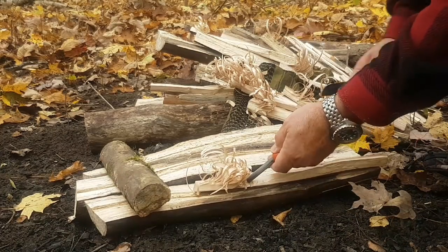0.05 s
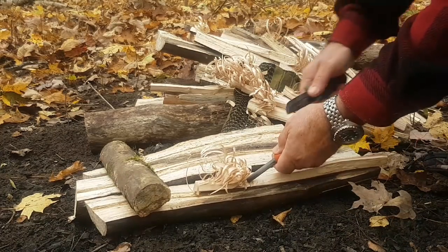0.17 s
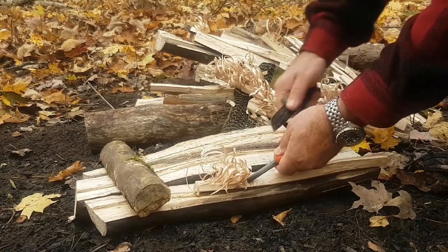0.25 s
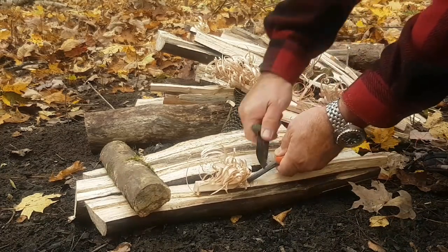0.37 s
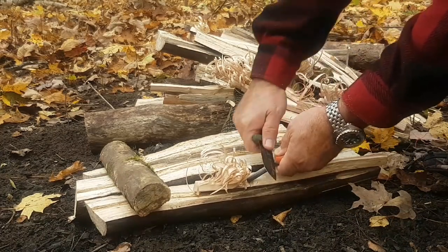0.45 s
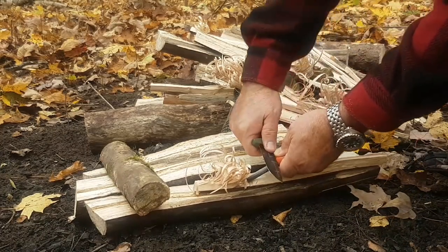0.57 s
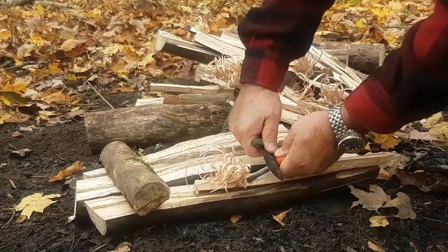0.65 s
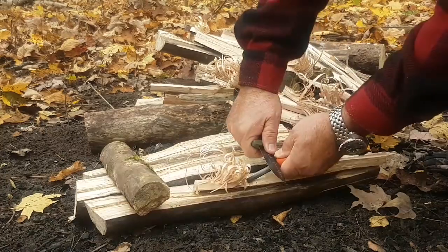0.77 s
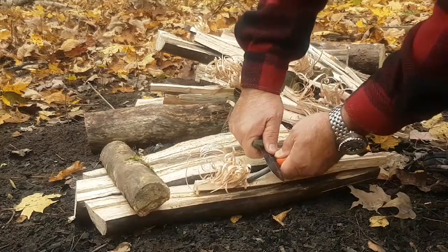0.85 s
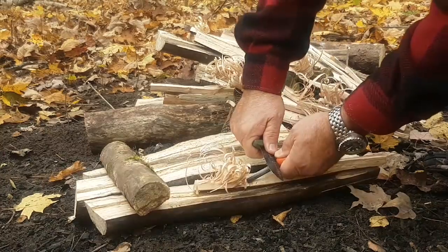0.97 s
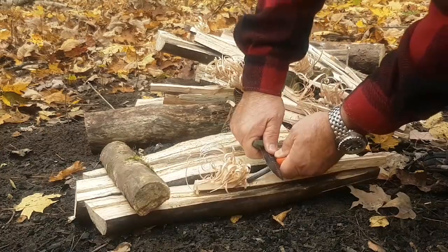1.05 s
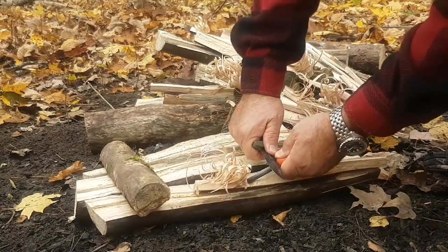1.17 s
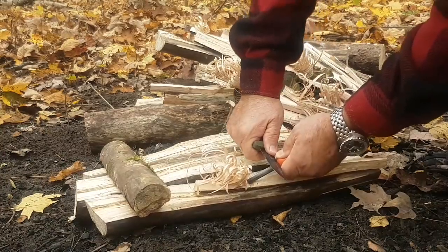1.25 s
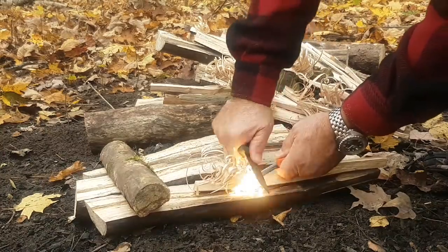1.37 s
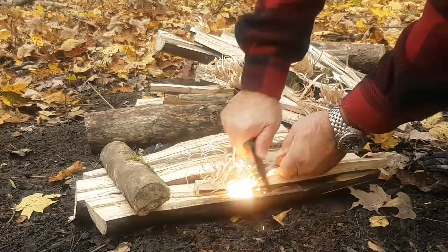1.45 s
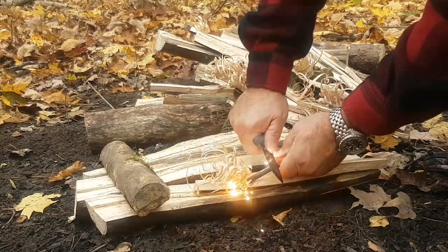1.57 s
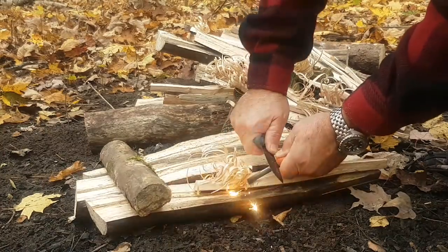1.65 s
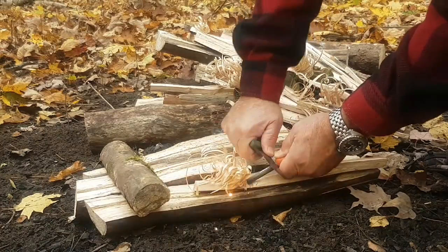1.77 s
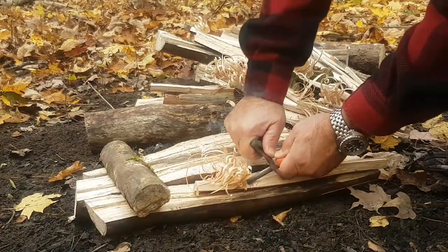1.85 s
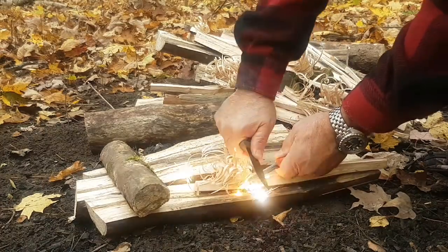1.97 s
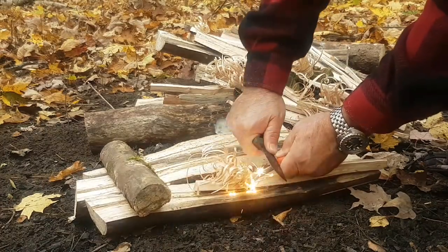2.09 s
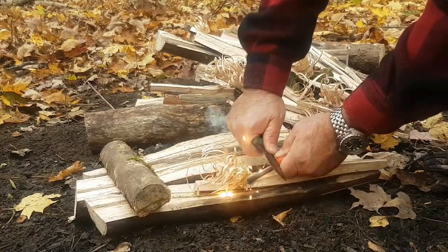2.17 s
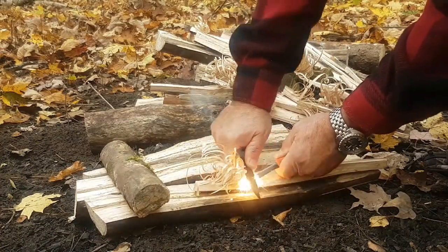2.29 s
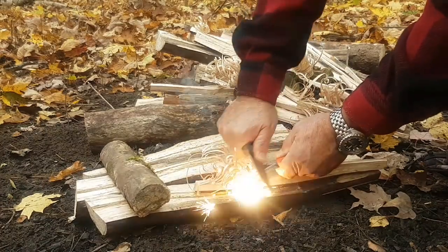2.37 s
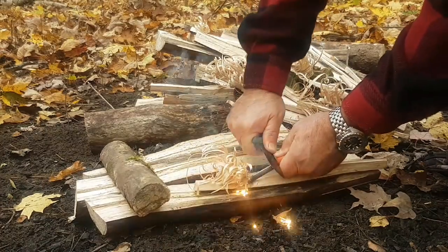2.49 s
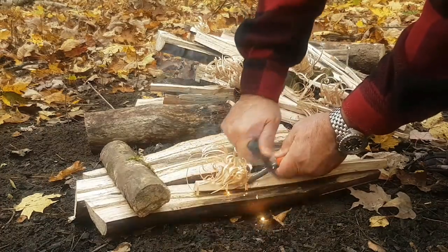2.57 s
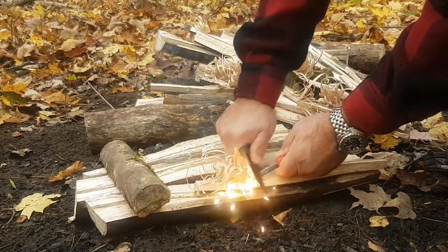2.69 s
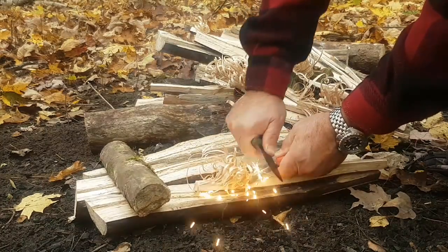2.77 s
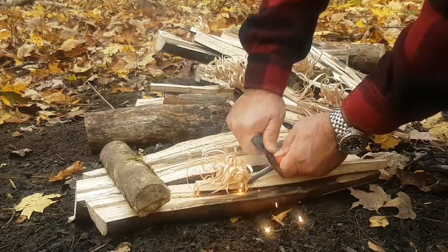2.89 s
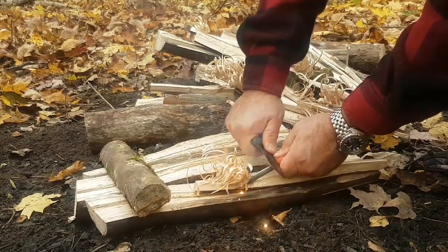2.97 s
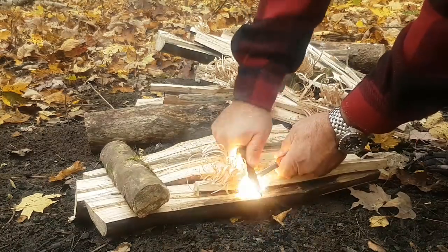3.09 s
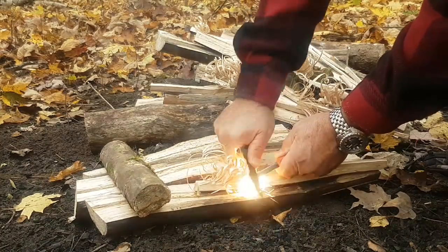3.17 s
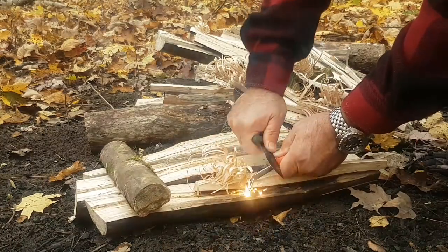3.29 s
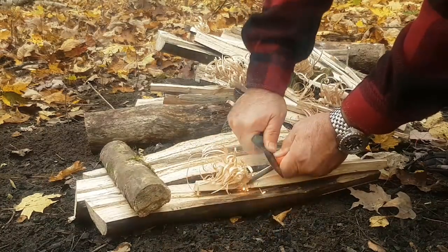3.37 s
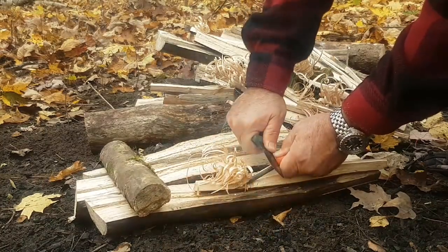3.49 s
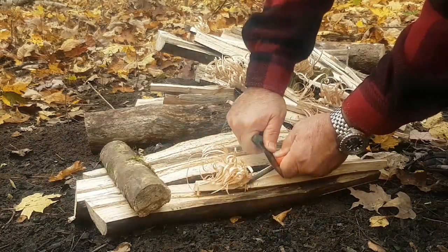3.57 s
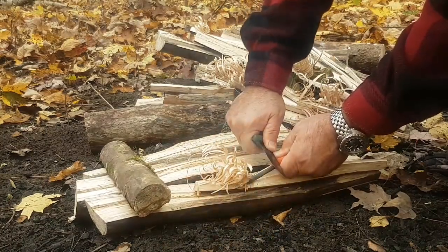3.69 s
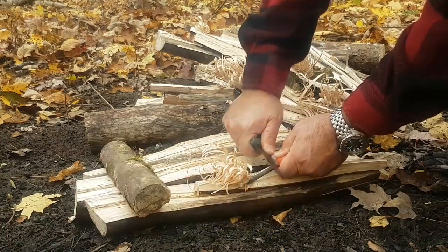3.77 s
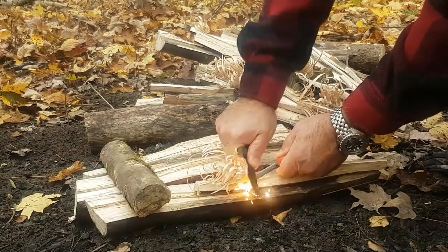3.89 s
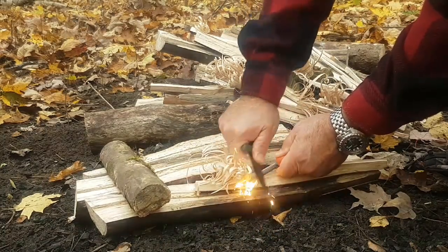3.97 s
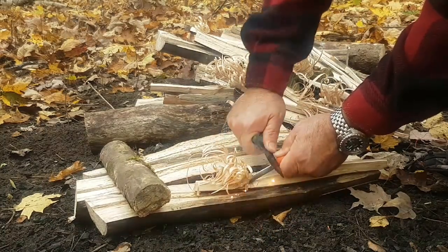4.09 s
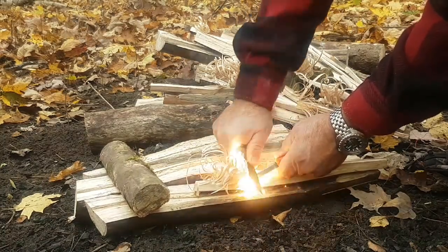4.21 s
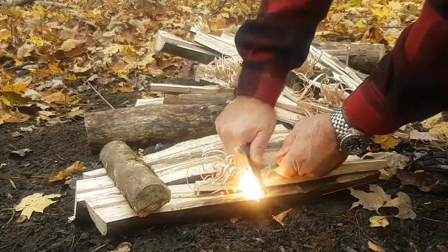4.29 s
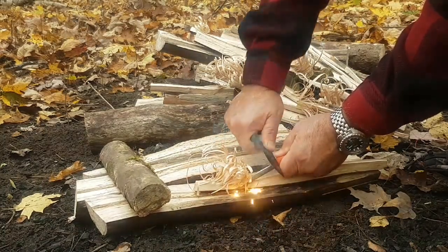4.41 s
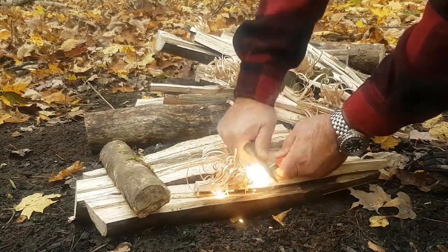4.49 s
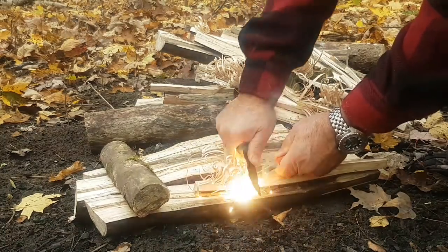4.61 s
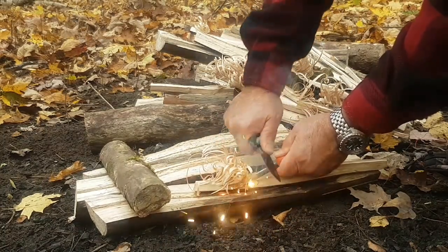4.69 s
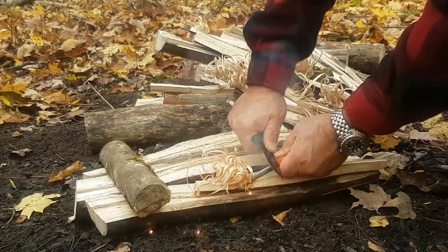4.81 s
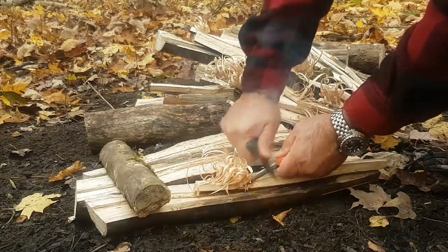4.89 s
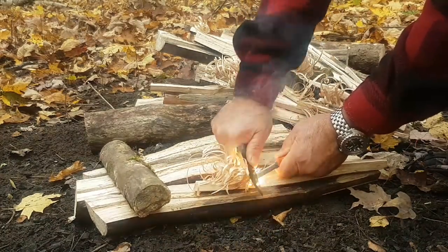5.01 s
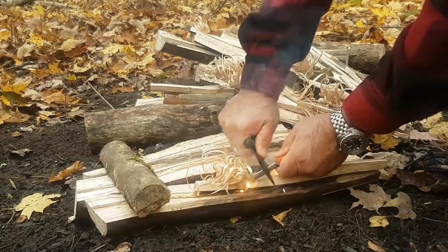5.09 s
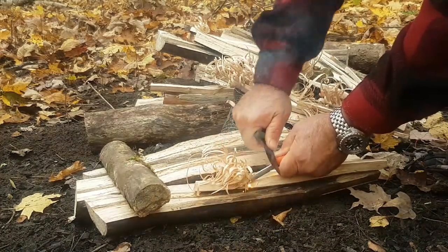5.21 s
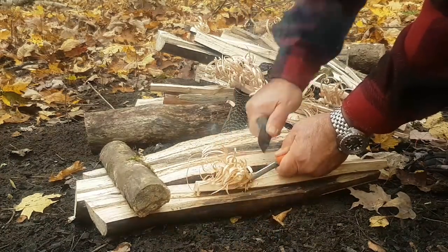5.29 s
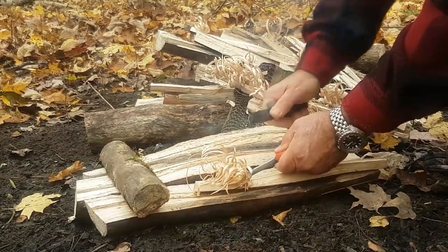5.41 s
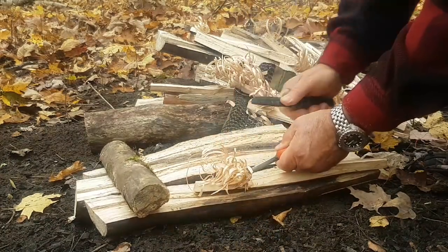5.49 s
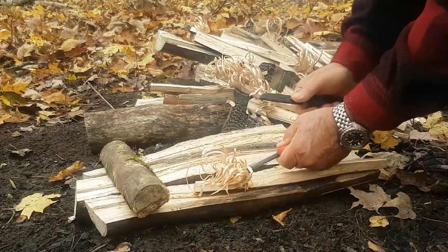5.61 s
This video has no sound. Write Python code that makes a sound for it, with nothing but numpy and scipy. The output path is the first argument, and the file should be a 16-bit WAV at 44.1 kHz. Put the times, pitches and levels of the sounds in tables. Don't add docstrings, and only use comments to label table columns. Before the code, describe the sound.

Close, harsh metal scrapes on a fire-starting rod over split wood, blade knocks and tiny spark pops between them, against faint outdoor rumble.

```python
import sys
import numpy as np
from scipy import signal
from scipy.io import wavfile
from scipy.ndimage import uniform_filter1d

SR = 44100
rng = np.random.default_rng(int(sys.argv[2]) if len(sys.argv) > 2 else 0)


def amplitude_ratio(level_db):
    exponent = np.asarray(level_db, float) / 20
    return 10 ** exponent


def to_wav(s):
    ch = np.atleast_2d(s).T
    pcm = np.round(np.clip(ch, -1, 1) * 32767)
    wavfile.write(sys.argv[1], SR, pcm.astype(np.int16))


N = 249165
CONTROL_STEP = 16

# hz, width_hz, level_db
ROD_LOW = [(684, 8, -4), (1220, 27, 12), (1247, 25, 2.5), (2120, 36, -42)]
ROD_HIGH = [(2394, 92, -1), (2526, 112, 3.5), (2960, 57, -1.5), (2880, 54, -7)]
# hz, level_db_per_hz
GRIT = [(1470, -35), (2500, -3), (3480, -4.5), (4450, -11), (5270, -3), (6190, -5), (6690, -3), (7620, -7),
        (8490, -5.5), (9530, -12), (12000, -3), (13700, -12.5), (15700, -12)]
# hz, level_db_per_hz
TICK = [(300, -23), (800, 9), (1500, -0.5), (2600, 6.5), (4500, -16), (7000, -32), (12000, -63),
        (16000, -23)]
# start_s, length_s, ring_db,
# swell_db, upper_over_lower_db
RETURNS = [(0.545, 0.069, -67.5, -0.5, -8), (1.47, 0.062, -60, 6, 5), (2.039, 0.075, -71, 6.5, 11.5),
           (2.38, 0.11, -48, -5.5, -1.5), (2.738, .1, -45, -12.5, -1), (3.189, .17, -52, -5, -3.5),
           (3.957, 0.11, -47.5, -8, -0.5), (4.301, 0.094, -58, 6, 2), (4.678, 0.11, -52.5, -8.5, 1.5),
           (5.057, .16, -53.5, -15, -0.5), (4.975, 0.037, -55.5, 6, -21), (4.165, 0.028, -73.5, 9, 9.5)]


def evened(x):
    return x / np.sqrt(np.mean(x ** 2) + 1e-20)


def drift(size):
    once = uniform_filter1d(rng.standard_normal(N), size=size)
    return evened(uniform_filter1d(once, size=size))


def patchy(noise, bins, frames):
    over_hz = uniform_filter1d(noise, size=bins, axis=0)
    return evened(uniform_filter1d(over_hz, size=frames, axis=1))


def read(points, hz):
    f, value = np.transpose(points)
    return np.interp(np.log(hz + 1), np.log(f + 1), value)


def causal(db):
    log_gain = np.log(amplitude_ratio(np.maximum(np.r_[db, db[-2:0:-1]], -100)))
    return np.fft.ifft(np.exp(np.conj(signal.hilbert(log_gain)))).real[:1024]


def colour(x, points):
    response = causal(read(points, np.fft.rfftfreq(2048, 1 / SR)))
    return signal.oaconvolve(x, response)[:len(x)]


def level(x, lo_hz, hi_hz):
    band_filter = signal.butter(4, [lo_hz, hi_hz], "band", fs=SR, output="sos")
    return x / np.sqrt(np.mean(signal.sosfilt(band_filter, x) ** 2))


def below(x, hz):
    taps = signal.firwin(511, hz, window=("kaiser", 9), fs=SR)
    return signal.oaconvolve(x, taps[None], "same")


def resonate(x, hz, width_hz):
    pole = np.exp((2j * np.pi * hz - np.pi * width_hz) / SR)
    return 2 * signal.lfilter([1 - abs(pole)], [1, -pole], x).real


def ring(force, modes, damping=0.68):
    return sum(amplitude_ratio(db) * resonate(force, hz, width_hz * damping) for hz, width_hz, db in modes)


def spread(gain):
    return np.interp(np.arange(N), np.arange(0, N, CONTROL_STEP), gain)


def grains(per_s, spread_db, smooth, clump_db):
    size = amplitude_ratio(spread_db * np.minimum(rng.exponential(1, N), 4))
    slips = size * (rng.random(N) < per_s / SR) * rng.choice([-1., 1.], N)
    return amplitude_ratio(clump_db * drift(130)) * (evened(slips) + smooth * rng.standard_normal(N))


def pressing(part_db, stretch, share, steep):
    # start_s, rise_s, hold_s, pressure_db, let_go_db_per_s
    pushes = [(1.322, 0.021, 0.11, -46.5, 298), (1.89, 0.0097, 0.012, -42.5, 121),
              (2.237, 0.055, 0.015, -42.5, 190), (2.591, 0.071, 0.011, -40.5, 264),
              (3.064, 0.019, 0.048, -45, 155), (3.809, 0.061, 0.0094, -40.5, 240),
              (4.186, 0.024, 0.032, -43.5, 325), (4.505, 0.031, 0.084, -45.5, 212),
              (4.926, 0.047, 0.021, -42.5, 338)]
    hard_db = -43
    t = np.arange(0, N, CONTROL_STEP) / SR
    start, rise, hold, db, fall = np.transpose(pushes)[:, :, None]
    bite_db, bite_curve = 33, 2.24
    climb_db = -bite_db * np.clip(1 - (t - start) / (rise * stretch), 0, 1) ** bite_curve
    fall_db = share * fall * np.maximum(t - start - rise - hold, 0)
    pressure_db = hard_db + steep * (db - hard_db)
    gains = amplitude_ratio(part_db + pressure_db + climb_db - fall_db) * (t > start)
    return spread(gains.sum(0))


def dragging(rows, part_db, upper_share=0, fade_db=0, arch_db=0):
    land_s, lift_db_per_s, arch_skew = 0.0066, 908, 1.7
    t = np.arange(0, N, CONTROL_STEP) / SR
    start, length, db, swell_db, *upper_db = np.transpose(rows)[:, :, None]
    along = np.clip((t - start) / length, 0, 1)
    shape_db = (swell_db + fade_db) * along + arch_db * (np.sin(np.pi * along ** arch_skew) - .5)
    lift_db = lift_db_per_s * np.maximum(t - start - length, 0)
    gains = amplitude_ratio(part_db + db + upper_share * sum(upper_db) + shape_db - lift_db)
    landing = np.clip((t - start) / land_s, 0, 1)
    return spread(np.sum(gains * landing, axis=0))


def scraping():
    # start_s, length_s, pressure_db, swell_db
    rubs = [(1.556, .082, -51, -12.5), (2.105, 0.052, -47.5, -10.5), (2.355, 0.066, -51, -2.5),
            (2.524, 0.061, -64.5, 0), (4.285, 0.064, -53.5, -3), (4.419, 0.071, -66.5, -2),
            (5.07, 0.062, -57, -15), (1.236, .07, -76, -4), (2.16, 0.057, -72, -6),
            (1.465, .06, -54.5, -12), (4.163, 0.039, -76, 10)]
    # hz, level_db_per_hz
    wood = [(41, -18), (70, -6), (163, 1), (310, -6.5), (700, -1.5), (1020, -6.5), (1220, -2), (1450, -6),
            (1840, -7), (2900, -8.5), (4000, -33), (5200, -42), (8800, -120)]
    tear = np.hypot(pressing(0, 1, 1, 0.93), dragging(rubs, 0) + dragging(RETURNS, -14, 0.22))
    hiss = level(colour(grains(9000, 3., .9, 1.9), GRIT), 4000, 16000) * tear

    weight = np.hypot(pressing(-2, 1.21, 0.67, 0.76), dragging(rubs, -5) + dragging(RETURNS, -4.5, 0.55))
    shake = level(colour(grains(2200, 3., .85, 2.4), wood), 150, 950) * weight

    slips = grains(3000, 2.5, 1.5, .8)
    return hiss + shake + lower_ring(slips) + upper_ring(slips)


def lower_ring(slips):
    low = ring(slips, ROD_LOW)
    low = evened(low / uniform_filter1d(low ** 2, size=220) ** .3)
    knot_db = 3
    grip = np.hypot(pressing(-9.5, 0.9, 1.8, 1), dragging(RETURNS, 0))
    return low * amplitude_ratio(knot_db * drift(500)) * grip


def upper_ring(slips):
    grip_damping, mottle_db = 5.1, 2.5
    held = ring(slips * pressing(-2, -1.5, 6.5, 0.5), ROD_HIGH, grip_damping)
    held /= np.std(ring(slips, ROD_HIGH, grip_damping))

    points = len(range(0, N, CONTROL_STEP))
    spots = uniform_filter1d(rng.standard_normal((points, len(ROD_HIGH))), size=50, axis=0).T
    light = slips * dragging(RETURNS, 0, 1, arch_db=7)
    free = np.zeros(N)
    for mode, spot in zip(ROD_HIGH, spots):
        free += ring(light * amplitude_ratio(mottle_db * spread(evened(spot))), [mode], 0.71)
    return held + free / np.std(ring(slips, ROD_HIGH))


def knocks():
    # start_s, peak_db, upper_ring_hz, brightness_db, upper_over_lower_db
    blows = [(0.4813, -35, 2550, -1, 8), (0.5907, -46.5, 3100, -5, -4), (1.2482, -50, 2010, 1.5, 8),
             (1.283, -55.5, 3170, -2, 8), (1.3126, -44.5, 3300, -3, 2), (1.7721, -33.5, 3150, -8.5, 1),
             (2.1187, -26.5, 2310, -8, 0), (2.504, -45.5, 2280, -8, -16), (2.748, -40, 2440, 4, 6),
             (2.8765, -38.5, 2250, -14, -19), (3.0586, -45, 2470, 0, 15), (3.1988, -35.5, 2620, -9, -14),
             (3.3467, -41, 2240, 1, -4), (3.7991, -26.5, 2390, -7, 9.5), (3.9652, -30.5, 2500, -1.5, 1),
             (4.0045, -44, 2480, -12, -2), (4.3919, -29, 2430, -10, 1), (4.447, -45.5, 2600, -13, -10),
             (4.7882, -44, 2290, 0, -19), (5.229, -51, 2300, 6, -13), (5.238, -50, 2200, 5, -10),
             (1.77, -39, 2500, -18, -1)]
    contact_s = 0.0011
    out, t = np.zeros(N + 2000), np.arange(2000) / SR
    for s, db, upper_hz, bright_db, upper_db in blows:
        force = rng.standard_normal(2000) * t * np.exp(-t / contact_s)
        shift = upper_hz / ROD_HIGH[1][0]
        upper = [(hz * shift, width_hz, mode_db) for hz, width_hz, mode_db in ROD_HIGH]
        body = evened(ring(force, ROD_LOW, 2.2)) + amplitude_ratio(upper_db) * evened(ring(force, upper, 1.7))
        tick = colour(force, TICK)
        at = round(s * SR)
        out[at:at + 2000] += amplitude_ratio(db) * (body / abs(body).max() + amplitude_ratio(bright_db) * tick / abs(tick).max())
    return out[:N]


def sparks():
    # start_s, peak_db, tilt_db_per_octave, left_right_db
    pops = [(1.5573, -18.5, 0.5, 0), (1.7087, -44.5, 0, 4), (1.7657, -36, -1.5, 6),
            (2.0594, -50, -1.5, 2.0), (2.211, -39, -5, 0), (2.3627, -21, -2, -3), (2.664, -42, -3, 0.5),
            (2.9597, -43, -4, 2.0), (2.9914, -46, 4, 1.5), (3.2213, -30, -3.5, 1), (3.244, -29.5, -3, -2),
            (3.9467, -34, 0, 1.0), (4.299, -25, -1, -1), (4.4593, -35.5, -3, 2.0), (4.4744, -38, -2, 0),
            (5.124, -42, 4, 0.5), (5.19, -39, 2, 3)]
    # start_s, peak_db, left_right_db
    burns = [(0.6769, -54.5, 0.0), (1.5894, -37, -1), (1.61, -50, 1.5), (2.006, -29.5, 0), (2.0416, -34, 1),
             (2.2054, -48, 3), (2.395, -31.5, -3), (2.4222, -28.5, 2.0), (2.5461, -52, 6), (2.586, -45, -3),
             (3.3636, -48, 3.0), (3.3867, -54, 0.5), (3.7155, -53, 2), (4.1827, -41, 2), (4.3544, -39, -2),
             (4.405, -48, -1), (4.785, -38, 1), (5.049, -38, -2), (5.098, -40, -1), (2.3605, -26, 1.0)]
    pop_fizz_ms, burn_fizz_ms = 1.36, 3.5
    bursts = [(*pop, pop_fizz_ms) for pop in pops]
    bursts += [(s, db, 0, pan_db, burn_fizz_ms) for s, db, pan_db in burns]
    out, t = np.zeros((2, N + 1024)), np.arange(1024) / SR
    hz = np.fft.rfftfreq(2048, 1 / SR)
    octaves = np.log2((hz + 1) / 8000)
    grit_db = .7 * read(GRIT, np.clip(hz, 2800, 15000))
    bass_cut_db = 7. * np.minimum(octaves + 2.5, 0)
    for s, db, tilt_db, pan_db, fizz_ms in bursts:
        fizz = .14 * fizz_ms ** 2 * rng.standard_normal((2, 1024)) * np.exp(-1000 * t / fizz_ms)
        shape = causal(tilt_db * octaves + grit_db + bass_cut_db)
        click = signal.fftconvolve((t == 0) + fizz, shape[None])[:, :1024]
        at = round((s + .0009) * SR)
        gain = amplitude_ratio(db + np.array([[.5], [-.5]]) * pan_db)
        out[:, at:at + 1024] += gain * click / abs(click).max()
    return out[:, :N]


def clacks():
    # start_s, peak_db
    hits = [(2.544, -42), (2.548, -42), (2.5525, -54), (2.574, -48), (2.5823, -42), (2.5875, -38),
            (2.5912, -40), (.597, -41), (2.168, -58), (2.19, -55), (4.459, -40)]
    (s, db), force = np.transpose(hits), np.zeros(N)
    force[np.round(s * SR).astype(int)] = amplitude_ratio(db)
    unit_click = colour(np.r_[1., np.zeros(99)], TICK)
    return colour(force, TICK) / abs(unit_click).max()


def ports(x):
    # hz, left_right_likeness
    near_same = [(60, .99), (300, .97), (1500, .94), (3000, .82), (6000, .6), (10000, .45), (15000, .3)]
    # hz, left_right_db
    near_lean = [(60, -.5), (250, -2.3), (600, -2.6), (1200, -1.5), (2500, -1.7), (5000, .4), (9000, 3.3),
                 (14000, 3.2)]
    # hz, left_lead_rad
    near_turn = [(0, 0), (2500, -.1), (4000, .5), (6300, -.7), (8000, -.2), (11800, -.6), (12700, -1.4),
                 (16000, -2.2)]
    patch_db = 1.5
    hz, t, z = signal.stft(x, SR, nperseg=256, noverlap=192)
    jitter_rad = np.sqrt(-2 * np.log(np.clip(read(near_same, hz), .05, 1)))[:, None]
    jitter = patchy(rng.standard_normal((len(t), len(hz))).T, 5, 6)
    patches = patchy(rng.standard_normal((len(t), len(hz))).T, 5, 14)
    z = z * amplitude_ratio(patch_db * patches)
    half = np.array([.5, -.5])[:, None, None]
    turn = half * (read(near_turn, hz)[:, None] + jitter_rad * jitter)
    paths = amplitude_ratio(half * read(near_lean, hz)[:, None]) * np.exp(1j * turn)
    return signal.istft(z * paths, SR, nperseg=256, noverlap=192)[1][:, :N]


def woods():
    # hz, level_db_per_hz
    air = [(12, -40), (20, -17), (22, -38), (45, -6), (109, -3), (139, -9), (234, -15.5), (292, -17),
           (440, -18.5), (518, -22), (563, -22.5), (896, -26), (2530, -32.5), (9160, -51), (13800, -47)]
    # hz, left_right_likeness
    air_same = [(60, .97), (130, .93), (290, .65), (640, .25), (1400, -.15), (3000, .05), (15000, 0)]
    # hz, left_right_db
    air_lean = [(60, -0.5), (180, -1.5), (550, -2.0), (1650, -3), (4970, -1), (15000, 3)]
    # time_s, rumble_db, leaf_hiss_db
    swell = [(0, 1, 4), (.6, -2, 6.5), (1.2, -2, 4), (1.8, -1, 6), (2.9, 1.7, 8), (3.599, 1.1, 4),
             (4.8, 0.8, 7.5), (5.65, 0, 4.9)]
    air_db = -58.5
    frames, hz = N // 512 + 5, np.fft.rfftfreq(2048, 1 / SR)
    a, b, c, d, noise = rng.standard_normal((frames, 1025, 5)).T
    patches = patchy(noise, 12, 8)

    s, rumble_db, hiss_db = np.transpose(swell)
    t = np.arange(frames) * 512 / SR
    low = (1 / (1 + (hz / 300) ** 2))[:, None]
    swell_db = low * np.interp(t, s, rumble_db) + (1 - low) * np.interp(t, s, hiss_db)

    same, left = np.clip(read(air_same, hz), -1, 1)[:, None], a + 1j * b
    z = np.array([left, same * left + np.sqrt(1 - same ** 2) * (c + 1j * d)])
    lean_db = np.array([.5, -.5])[:, None, None] * read(air_lean, hz)[:, None]
    body_db = read(air, np.minimum(hz, air[-1][0] - 600))[:, None]
    z *= amplitude_ratio(body_db + 0.99 * patches + lean_db)
    scale = np.std(signal.istft(z.mean(0), nperseg=2048, noverlap=1536)[1])
    sound = signal.istft(z * amplitude_ratio(swell_db), nperseg=2048, noverlap=1536)[1][:, :N]
    return amplitude_ratio(air_db) / scale * sound


def whines():
    # time_s, pitch_hz, level_db
    high_path = [(0, 14220, -89), (.5, 14250, -89), (1.2, 14200, -89), (3.5, 14220, -89),
                 (3.6, 14260, -110), (3.9, 14300, -110), (4.1, 14320, -90), (5.65, 14310, -89)]
    # pitch_hz, level_db
    low_hz, low_db = (10380, -98)
    width_hz = 90
    t, (s, hz, db) = np.arange(N) / SR, np.transpose(high_path)
    a, b = uniform_filter1d(rng.standard_normal((2, 2, 2, N)), size=SR // width_hz, axis=3)
    chorus = a + 1j * b
    chorus /= abs(chorus) ** .7 * np.std(chorus.real / abs(chorus) ** .7)
    chorus = .6 * chorus + .6 * chorus[:, :1]
    high_turn = np.exp(2j * np.pi * np.cumsum(np.interp(t, s, hz)) / SR)
    high = amplitude_ratio(np.interp(t, s, db)) * (chorus[0] * high_turn).real
    low = amplitude_ratio(low_db) * (chorus[1] * np.exp(2j * np.pi * low_hz * t)).real
    return high + low


def bird():
    # time_s, pitch_hz, level_db
    note = [
        (2.915, 1800, -95),
        (2.935, 1810, -77),
        (2.957, 1850, -71),
        (2.98, 1810, -79),
        (2.99, 1830, -85),
        (3.01, 1855, -74),
        (3.035, 1810, -95),
    ]
    t, (s, hz, db) = np.arange(N) / SR, np.transpose(note)
    phase = 2 * np.pi * np.cumsum(np.interp(t, s, hz)) / SR
    return np.sqrt(2) * amplitude_ratio(np.interp(t, s, db, -200, -200)) * np.sin(phase)


def scene():
    edge_hz, click_edge_hz = 15880, 16500
    pops = sparks()
    leak = amplitude_ratio(-14) * (below(pops, click_edge_hz) - below(pops, edge_hz))
    near = ports(scraping() + knocks() + clacks())
    return below(near + pops + woods() + whines() + bird(), edge_hz) + leak


def low_pass(x):
    return signal.sosfilt(signal.butter(12, 16590, fs=SR, output="sos"), x)


def record(dry):
    offset = -.0005
    return low_pass(dry + offset)


dry = scene()
out = record(dry)
to_wav(out)
```